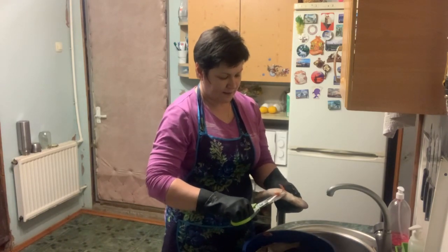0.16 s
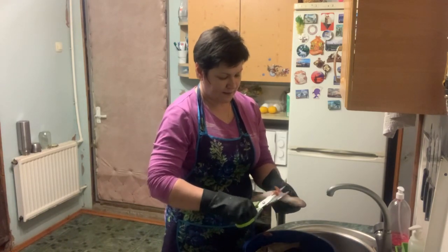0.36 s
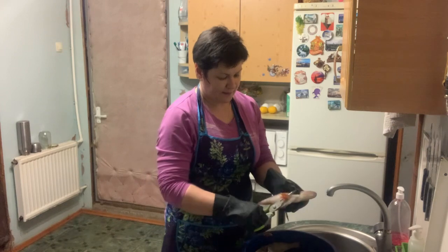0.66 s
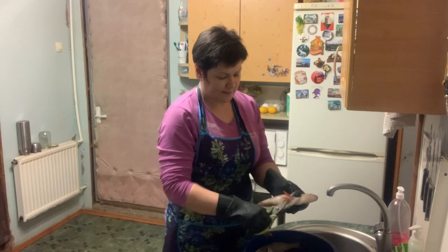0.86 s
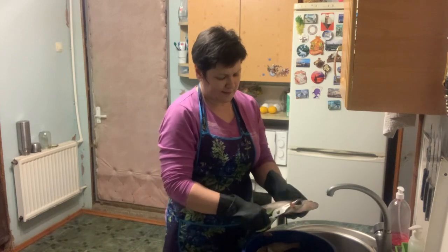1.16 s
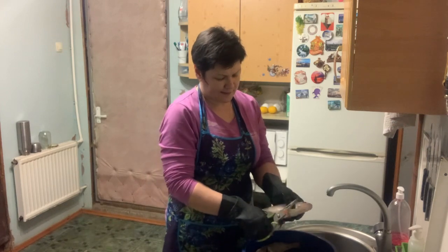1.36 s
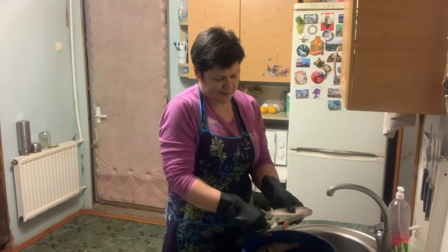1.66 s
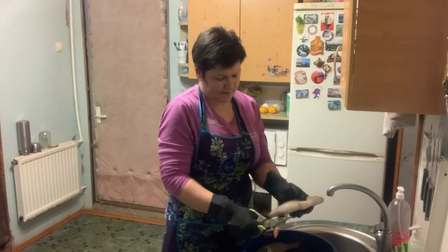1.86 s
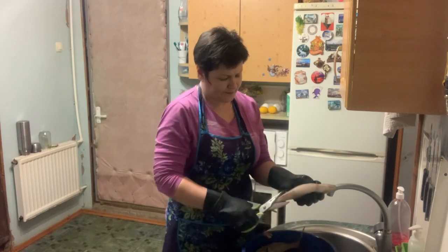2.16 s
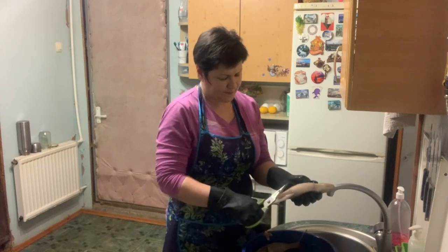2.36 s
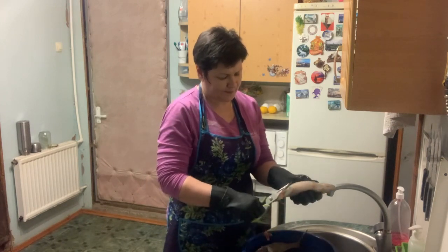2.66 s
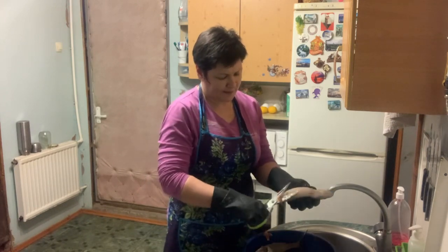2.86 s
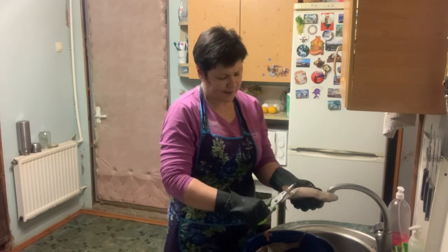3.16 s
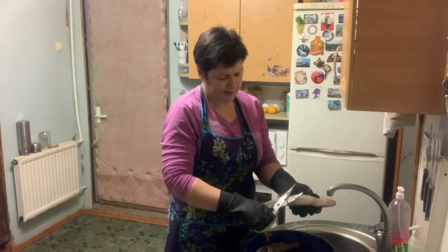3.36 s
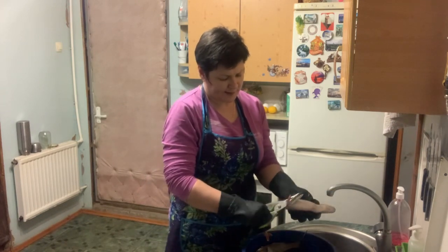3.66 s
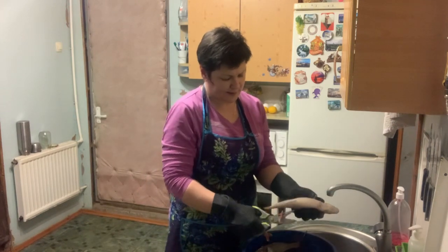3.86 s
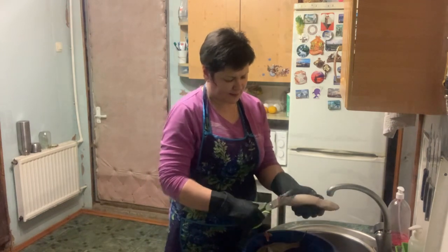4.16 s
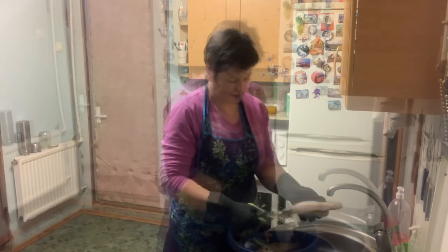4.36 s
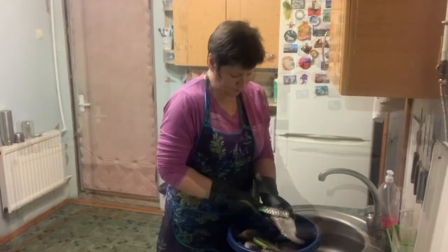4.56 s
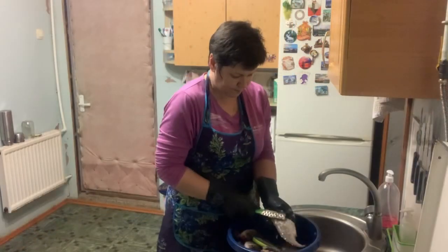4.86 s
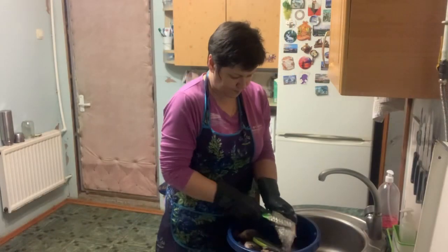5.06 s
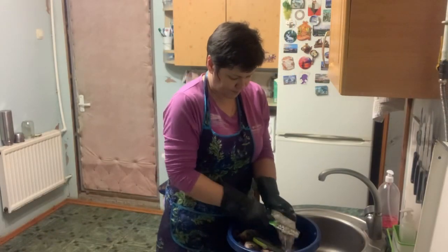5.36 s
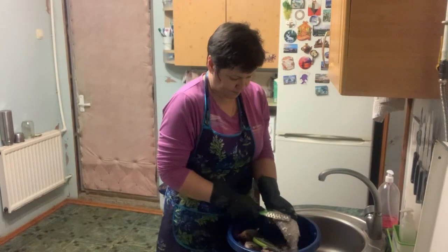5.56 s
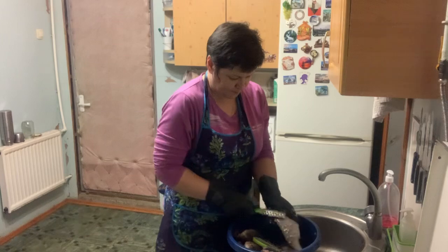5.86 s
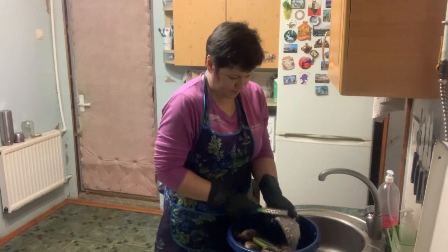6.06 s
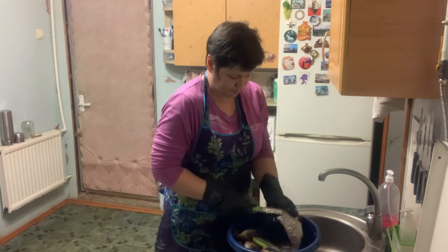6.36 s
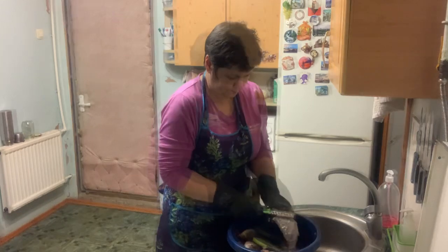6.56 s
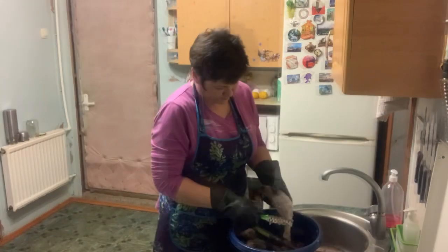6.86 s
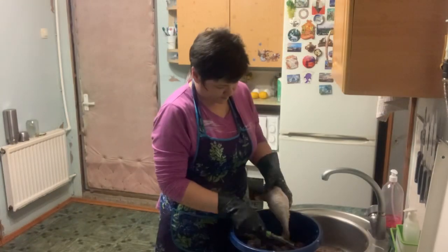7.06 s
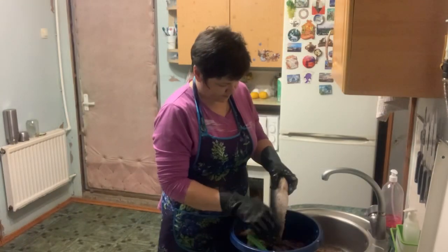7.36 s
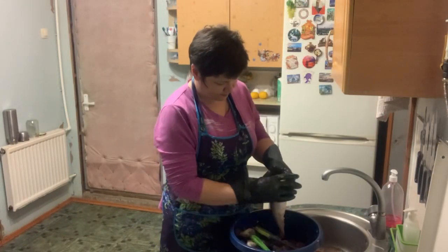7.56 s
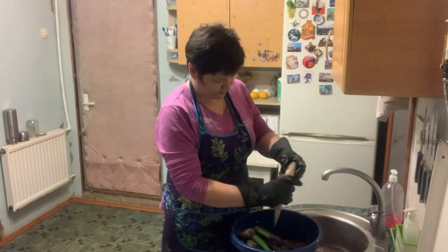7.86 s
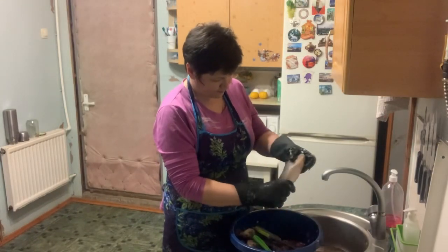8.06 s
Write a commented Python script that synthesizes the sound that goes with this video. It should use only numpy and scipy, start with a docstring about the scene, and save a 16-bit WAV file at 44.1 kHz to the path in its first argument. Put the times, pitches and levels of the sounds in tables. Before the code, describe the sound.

Close stereo pickup of fish cleaning at a sink in a small reverberant room. Mostly quiet metallic scissor clicks surround one dominant sharp crack early on. After several lighter snips comes a burst of short dry rasps, pull and return, over dull bumping fish flesh with crisp tearing scales. The rasps weaken, a tool knocks into a basin, and wet-sounding rubber gloves shift quietly over steady faint hush.

```python
"""A kitchen with bare hard walls: scissors snip through fish fins, then a toothed scaler is drawn to and fro
along the fish, and is dropped in a basin. Rubber gloves rustle in between, over steady room tone.
Snips, catches and knocks are short rings, noise cracks and thuds; the scaler and gloves are streams of
tiny random contacts. Fading noise makes the room's echo, which rings for up to half a second."""
import sys
import numpy as np
from scipy import signal
from scipy.fft import rfft, irfft, next_fast_len
from scipy.io import wavfile
from scipy.ndimage import map_coordinates

SR = 44100
rng = np.random.default_rng(int(sys.argv[2]) if len(sys.argv) > 2 else 0)


def wav_out(sig):
    """Save sig, one row per channel (or a flat mono array), as 16-bit PCM at SR to the path in sys.argv[1]."""
    wavfile.write(sys.argv[1], SR, np.round(np.clip(np.atleast_2d(sig).T, -1, 1) * 32767).astype(np.int16))


N = 361619

# Scissor snips and ticks: start_s, level_db, snap_pitch_hz, thud_db, crack_db, crack_centre_hz,
# crack_width_octaves (thud and crack are relative to the level)
SNIPS = [ (0.385, -54, 1470, -13, 0.5, 2480, 0.85), (0.57, -47, 1560, -5, -11, 1600, 1.6),
         (0.688, -50, 2420, -3, 1, 7500, 2.2), (.828, -64, 1560, -8, 8.5, 6800, 1.7),
         (.979, -45.5, 2400, -14, 1.5, 4550, 1.8), (0.9994, -38.5, 2420, -6, -1.5, 5000, 1.6),
         (1.038, -30, 2440, -6, 2, 5160, 2.3), (1.0432, -36, 1220, 1.5, 1, 2600, 4.3),
         (1.09, -48, 1210, 8, -6, 2600, 2), (1.25, -61, 1920, -13, 2, 1800, 0.43),
         (1.504, -65, 2360, -17, 8, 4030, 1.3), (1.552, -33, 1990, -3, 3.5, 2970, 1.24),
         (1.5592, -4, 1910, -24, -13.5, 3150, 0.75), (1.979, -56, 1660, -26, -10, 1520, 0.76),
         (2.077, -53, 1356, -13, -18, 1693, 0.75), (2.3555, -42.5, 1620, -13.5, -5.5, 3400, 1.12),
         (2.526, -57, 2320, -2, 1.5, 6000, 1.2), (2.538, -46, 2310, -13, 0, 4000, 1.3),
         (2.5415, -41, 2350, -12, -1.5, 3590, 1.3), (2.986, -56.5, 1590, -16, 1.5, 4000, 1.5),
         (3.018, -46.5, 2330, -15, 0.5, 4600, 2.6), (3.096, -42, 2250, -19, 0.5, 3950, 1.4),
         (3.123, -36.5, 2220, -4, -.5, 4000, 2), (3.368, -36, 1186, -20, -14, 1896, 0.82),
         (3.565, -34, 2420, -1.5, -1, 3470, 1.6), (3.569, -31, 1176, -10, -9, 1750, 2.5),
         (3.579, -31, 1240, -11, -12, 1760, 2), (3.843, -54, 1280, -10, -3.5, 2035, .76)]
# What all snips share: boom_under_thud_db, snap_overtone_db, crack_fade_s, crack_lead_in_db
SNIP_KIND = (-16.5, -6, 0.0066, -16)
# Scaler teeth catching a scale: columns as for the snips
CATCHES = [ (4.115, -60, 3890, -8, 5, 3820, 2), (4.468, -38.5, 3900, -19, 2, 6400, 0.84),
           (4.732, -47.5, 3550, -1, 10, 6740, 2), (5.0548, -43, 1530, 13.5, 3.5, 2520, 1.9),
           (5.0834, -40, 3700, -5, 6, 7200, 0.79), (5.138, -31, 3520, -22, -5, 3700, 0.75),
           (5.414, -44, 1670, 9, 2, 6800, 1), (5.44, -44, 3880, 7, 7, 6800, 0.38),
           (5.575, -40, 2640, -4, -1.5, 3550, 2.4), (5.618, -41.5, 1800, -6, -22, 2500, 3),
           (5.7154, -34.5, 3960, -2.5, 4.5, 6800, .8), (5.793, -36, 3630, -28, -4.5, 3640, 0.68),
           (6.027, -52, 2090, 3, 11.5, 4020, 2.8), (6.2955, -50, 1550, 2, 5, 3800, 1.6)]
# What all catches share: columns as for the snips
CATCH_KIND = (-20.5, -10, 0.0083, -30)
# Knocks in the basin: columns as for the snips
KNOCKS = [(6.9836, -53, 1510, -13, 2, 1350, 1.36), (7.2675, -54, 1660, -1, -5, 1690, 1.2),
          (7.3398, -15.5, 1970, -9.5, -13, 1700, .75), (7.555, -50, 1180, -1, -3, 1370, 0.66),
          (7.69, -53, 1230, 9.5, -1.5, 1450, 0.58), (7.804, -43.5, 1360, -7, -10, 1490, 1.5),
          (8.055, -66, 1400, 8, -6, 1500, 1)]
# What all knocks share: columns as for the snips
KNOCK_KIND = (-8, -11, .0065, -9)
# Ringing modes of the scissors: pitch_hz, level_db, t60_s (time to fade by 60 dB)
BLADE_MODES = [(1227, -8.5, .05), (2400, -16, 0.064)]
# Scaler strokes, pull and return in turn: start_s, length_s, peak_after_s, swell_to_peak_db, bumping_db,
# rattling_db, tearing_db
STROKES = [ (4.114, .11, 0.071, 5.5, -57.5, -58.5, -53), (4.299, 0.043, 0.028, 0, -51.5, -64.5, -65),
           (4.401, 0.15, 0.061, 14, -46.5, -54, -41.5), (4.596, .065, 0.027, -0.5, -47, -62, -58),
           (4.744, 0.065, 0.095, 2.5, -43, -54.5, -41), (4.884, 0.1, .012, 1, -43.5, -55.5, -52),
           (5.051, 0.088, 0.029, 14.5, -36.5, -46.5, -35), (5.205, .11, .055, 12, -38, -57.5, -55),
           (5.383, 0.12, 0.059, 14.5, -37.5, -50, -39), (5.578, 0.084, .03, 4, -47.5, -59.5, -58.5),
           (5.701, 0.1, 0.044, 15, -35.5, -48.5, -39), (5.892, 0.044, 0.024, 1, -43.5, -58, -56),
           (6.019, 0.11, 0.015, 9.5, -42.5, -54, -46.5), (6.179, 0.056, 0.024, 5, -50, -61.5, -61.5),
           (6.295, 0.1, 0.073, 4, -50, -61.5, -56), (6.468, .06, 0.035, 11, -46, -62.5, -59),
           (6.592, 0.066, 0.012, 9, -49.5, -61.5, -58), (6.746, 0.15, 0.062, 5, -49, -60.5, -60)]
# Dull modes of the fish in the hand: pitch_hz, width_hz, level_db
FLESH_MODES = [(194.6, 119, -4.5), (290.8, 46, 2), (374, 36, -0.5), (433, 43, -1.5), (503, 55.6, 0)]
# Sizes of scale: centre_hz, width_octaves, level_db
SCALE_SIZES = [(3700, 0.5, -2.5), (6800, 0.26, -4.5), (11100, 0.435, 0)]
# Gloves shifting on the fish: time_s, rustle_db, bright_rustle_db
GLOVE_LEVELS = [(0.0, -104, -97), (0.3, -79, -78), (0.5, -69.5, -86), (0.75, -75.5, -78),
                (0.95, -82.5, -83), (1.2, -77.5, -76), (1.9, -66.5, -90.5), (2.06, -90.5, -99.5),
                (2.26, -71.5, -83), (2.6, -65.5, -80.5), (2.95, -82.5, -91), (3.15, -60, -70.5),
                (3.5, -91, -87.5), (3.85, -71, -84), (4.05, -86, -78), (6.8, -76.5, -82),
                (7.05, -68.5, -72), (7.45, -65, -76), (7.9, -65.5, -69.5), (8.2, -69.5, -73.5)]
# Single rubs of a glove: middle_s, length_s, low_db, rustle_db, bright_db
GLOVE_RUBS = [(0.399, 0.14, -69, -66, -79), (0.896, 0.095, -64, -73.5, -73), (1.285, 0.08, -82, -60, -85),
              (1.305, 0.05, -59, -81, -87), (2.156, 0.22, -67.5, -73.5, -106),
              (2.851, 0.047, -66, -69, -69), (3.026, 0.04, -65.5, -63.5, -58), (3.336, 0.04, -61, -65, -64),
              (7.28, 0.19, -80, -90, -87), (7.576, 0.056, -64, -75, -94.5), (7.686, 0.057, -65, -70, -83),
              (7.83, 0.059, -64, -62.5, -72), (8.063, 0.018, -71, -77, -73.5)]
# Colour of the rubber rustle: frequency_hz, level_db
RUBBER_COLOUR = [(500, -15), (900, -12.5), (1400, -4), (2200, -8.5), (3500, -13), (6000, -29)]
# Colour of the bright rustle: frequency_hz, level_db
SHEEN_COLOUR = [(2000, -33), (3500, 5), (6500, 2.5), (11000, -12.5), (16000, -4.5)]
# Colour of the room tone: frequency_hz, level_db (per Hz)
HUSH_COLOUR = [(15, -37.5), (25, -17), (70, -14.5), (102, -15), (157, -24), (363, -27.5), (1160, -36),
               (7920, -50.5), (9320, -48.5), (12200, -38.5), (16000, -58.5)]
# How alike left and right are in sound from all around: frequency_hz, likeness (1 = the same)
ALIKE = [(60, 0.81), (130, 1), (300, 0.3), (640, 0.017), (1400, 0.0051), (8000, 0.21), (11000, -0.14),
         (15000, 0.38)]
# How long the kitchen rings: frequency_hz, t60_s
KITCHEN_RING = [(100, 0.2), (350, .2), (700, 0.33), (2000, 0.4), (5000, 0.49), (9000, 0.3), (14000, 0.24)]
# Strength of the room against the direct sound: frequency_hz, level_db
ROOM_SHARE = [(100, -3), (400, 0), (1000, 11.5), (2000, 5.5), (4000, 3), (8000, 6), (14000, 6.5)]
# Colour of the microphones, with a shallow and two deep dips: frequency_hz, level_db
MIC_COLOUR = [(18, -32.5), (30, 0.5), (100, 0.5), (560, -3), (740, 0.5), (1000, -6.5), (1300, -3),
              (7500, -1), (8600, -2), (9550, -24), (10300, -6.5), (11300, -4.5), (12300, -12.5),
              (13400, -39), (14200, -11), (15000, -12.5), (15800, -24)]


def cuts():
    """Scissor blades bite in, then snap, crack the fin rays and thud in the flesh."""
    return contacts(SNIPS, SNIP_KIND)


def catches():
    """A scaler tooth catches on a scale: the same parts as a snip, with other settings."""
    return contacts(CATCHES, CATCH_KIND)


def knocks():
    """Knocks in the basin: the same parts as a snip, with a stronger boom."""
    return contacts(KNOCKS, KNOCK_KIND)


def contacts(rows, kind):
    """Each hard contact is a short snap, a noisy crack, a thud in the flesh and a boom in the basin."""
    boom_db, overtone_db, crack_fade_s, lead_in_db = kind
    snap_t60 = 2.6 * crack_fade_s
    lead = SR // 25  # samples kept before the contact
    out = np.zeros((2, N + SR))
    t = (np.arange(SR // 4) - lead) / SR
    after = np.maximum(t, 0)

    def ring(hz, t60):
        return np.sin(2 * np.pi * hz * after) * amp(-60 * after / t60) * (1 - np.exp(-after / .0003))

    thud = filtered((t >= 0) * np.exp(-after / 0.001), flesh)
    # the boom has a sliding tone over a lower steady one
    boom = np.sin(2 * np.pi * 115 * after * (1 - 0.72 * after)) + 0.42 * np.sin(2 * np.pi * 66 * after)
    boom = boom * amp(-60 * after / .3) * (1 - np.exp(-after / 0.0041))
    thump = thud / thud.max() + amp(boom_db) * boom

    for start_s, level_db, pitch_hz, thud_db, crack_db, centre_hz, octaves in rows:
        band = bell(centre_hz, octaves)
        lead_in = amp(lead_in_db) * np.exp(t / 0.0056)
        shape = np.where(t < 0, lead_in, np.exp(-after / crack_fade_s))
        crack = unit(filtered(rng.standard_normal(len(t)), band)) * shape
        # summed over all directions the crack has the smooth colour of its band
        click = 1. * (np.arange(len(t)) == lead + 40)
        spread = unit(filtered(click, band)) * crack.std()
        low = amp(thud_db) * thump
        # a snap near a mode of the scissors sets that mode ringing
        blades = sum(amp(mode_db) * bell(mode_hz, .08)(pitch_hz) * ring(mode_hz, t60)
                     for mode_hz, mode_db, t60 in BLADE_MODES)
        snap = 1.2 * ring(pitch_hz, snap_t60) + amp(overtone_db) * ring(1.45 * pitch_hz, snap_t60)
        direct = snap + amp(crack_db) * crack + low + blades
        # away from the blades' axis the snap has little pitch
        blunt = 1.6 * ring(pitch_hz, .004)
        around = blunt + amp(crack_db) * (spread + crack * (t < 0)) + low + blades
        wet = heard(amp(level_db) * direct, amp(level_db) * around)
        start = round(start_s * SR) - lead
        out[:, start:][:, :wet.shape[1]] += wet[:, :N + SR - start]
    return out[:, :N]


def scaler():
    """Teeth bump over the scale rows at an uneven rate and shake the flesh; scales tear off in bunches."""
    bumping, rattling, tearing = strokes()
    bumps_per_s = 150 * (1 + .35 * wobble(140))
    hit = np.diff(np.floor(np.cumsum(bumps_per_s) / SR), prepend=0) > 0
    bumps = hit * amp(4.5 * np.clip(rng.standard_normal(N), -3, 1.4))
    body = unit(filtered(unit(bumps) + 0.29 * rng.standard_normal(N), flesh))
    rattle = unit(filtered(grains(900, spread_db=2.5), bell(1480, 0.83)))

    bunching = wobble(250)  # all sizes catch together
    tear = np.zeros(N)
    for centre_hz, octaves, level_db in SCALE_SIZES:
        swing_db = np.minimum(4 * wobble(120) + 5 * bunching, 11)
        tear += amp(level_db + swing_db) * unit(filtered(grains(900, spread_db=6), bell(centre_hz, octaves)))

    low = bumping * amp(2.5 * wobble(30)) * body
    high = rattling * rattle + tearing * unit(tear)
    # the cook and the basin shade the walls
    return moving(low + high, amp(-6.5) * low + amp(-1.5) * high, pan_db=0.5)


def strokes():
    """Loudness of bumping, rattling and tearing: teeth bite, swell to a peak, ease and lift."""
    bite_db_per_s, ease_db_per_s, lift_db_per_s = 1000, 75, 520
    tear_rise_db_per_s, tear_sag_db_per_s, tear_end_db_per_s = 494, 108, 250
    press_swell = 0.55  # share of the swell that the bumping follows
    t = np.arange(-SR // 10, SR // 2) / SR
    out = np.zeros((3, N))
    early = np.maximum(-t, 0)
    for start_s, length_s, peak_s, swell_db, bump_db, rattle_db, tear_db in STROKES:
        past_peak = np.maximum(t - peak_s, 0)
        past_end = np.maximum(t - length_s, 0)
        short_db = swell_db * np.clip(1 - t / peak_s, 0, 1)  # how far still below the peak
        press = amp(-bite_db_per_s * early - press_swell * short_db
                    - ease_db_per_s * past_peak - lift_db_per_s * past_end)
        rip = amp(-tear_rise_db_per_s * early - short_db
                  - tear_sag_db_per_s * past_peak - tear_end_db_per_s * past_end)
        start = round((start_s + t[0]) * SR)
        out[:, start:][:, :len(t)] += [amp(bump_db) * press, amp(rattle_db) * rip, amp(tear_db) * rip]
    return out


def hands():
    """Gloves rub the fish and each other: a low drag and fine rubber grains, swelling with each rub."""
    rustle_db, sheen_db = curves(GLOVE_LEVELS)
    gain = amp([rustle_db - 6, rustle_db, sheen_db])  # low drag, rustle, bright sheen
    t = np.arange(N) / SR
    for middle_s, length_s, *levels_db in GLOVE_RUBS:
        swell = np.exp(-(2 * (t - middle_s) / length_s) ** 4)
        gain = gain + amp(levels_db)[:, None] * swell
    drag = unit(filtered(grains(300, spread_db=2), flesh))
    rustle = unit(coloured(amp(2.2 * wobble(40)) * grains(2000, spread_db=3.5), RUBBER_COLOUR))
    sheen = unit(coloured(grains(3400, spread_db=3.0), SHEEN_COLOUR))
    rubbing = np.sum(gain * [drag, rustle, sheen], axis=0)
    return moving(rubbing, amp(-2) * rubbing)


def hush():
    """Steady room tone: coloured noise arriving from all around."""
    return amp(-69.5) * unit(coloured(diffuse(N), HUSH_COLOUR))


def flesh(hz):
    """Response of the fish: a few dull modes; little passes above or below them."""
    modes = 0
    for k, (centre_hz, width_hz, level_db) in enumerate(FLESH_MODES):
        damping = 1j * hz * width_hz
        modes = modes + (-1) ** k * amp(level_db) * damping / (centre_hz ** 2 - hz ** 2 + damping)
    high, low = 1j * hz / 580, 1j * hz / 110
    treble_cut = 1 / (1 + 0.91 * high + high ** 2) ** 3
    bass_cut = low ** 2 / (1 + 1.7 * low + low ** 2)
    return modes * treble_cut * bass_cut


def heard(x, around, pan_db=0):
    """Direct sound at both microphones plus the room's echo, each frequency dying at its own speed."""
    hz, t, z = signal.stft(diffuse(SR // 2), SR, nperseg=256)
    fall = amp(-60 * t / along(KITCHEN_RING, hz)[:, None])
    share = amp(along(ROOM_SHARE, hz))[:, None] / np.linalg.norm(fall, axis=1, keepdims=True)
    tail = signal.istft(z * fall * share, SR, nperseg=256)[1] / np.sqrt(128)
    tail = tail * (1 - np.exp(-np.arange(tail.shape[1]) / SR / .003))  # the first walls take a few ms
    wet = signal.fftconvolve(around[None], tail, axes=1) * amp([[.6], [-.6]])
    lag = 3  # samples by which direct sound reaches the left microphone late
    wet[0, lag:len(x) + lag] += x * amp(pan_db / 2)
    wet[1, :len(x)] += x * amp(-pan_db / 2)
    return wet


def moving(x, around, pan_db=0):
    """A source that shifts about meets the walls anew every half second."""
    out, step = np.zeros((2, N + 2 * SR)), SR // 2
    for start in range(0, N, step):
        wet = heard(x[start:start + step], around[start:start + step], pan_db)
        out[:, start:start + wet.shape[1]] += wet
    return out[:, :N]


def diffuse(count):
    """A pair of noises whose left-right likeness varies with frequency, as in sound from all around."""
    def mid_and_side(hz):
        turn = np.arccos(np.clip(along(ALIKE, hz), -1, 1)) / 2
        return np.array([np.cos(turn), np.sin(turn)])

    mid, side = filtered(rng.standard_normal((2, count)), mid_and_side)
    return np.array([mid + side, mid - side])


def grains(per_s, spread_db):
    """Irregular single contacts of uneven size, scaled to an average (rms) level of 1."""
    hit = rng.random(N) < per_s / SR
    size = amp(spread_db * np.clip(rng.standard_normal(N), -3, 1.8))
    return unit(hit * rng.choice([-1, 1], N) * size)


def wobble(per_s):
    """A smooth random curve through per_s random points a second."""
    points = rng.standard_normal(int(N * per_s / SR) + 4)
    return map_coordinates(points, [np.arange(N) * per_s / SR])


def bell(centre_hz, octaves):
    """A bell-shaped band on a log frequency axis."""
    return lambda hz: np.exp(-.5 * (np.log2((hz + 1) / centre_hz) / octaves) ** 2)


def coloured(x, spectrum):
    """x with each frequency raised or lowered by a (Hz, dB) table."""
    return filtered(x, lambda hz: amp(along(spectrum, hz)))


def filtered(x, response):
    """x with its spectrum multiplied by a response that depends on frequency."""
    m = next_fast_len(x.shape[-1] + 4096)
    spectrum = rfft(x, m) * response(np.fft.rfftfreq(m, 1 / SR))
    return irfft(spectrum, m)[..., :x.shape[-1]]


def along(points, hz):
    """Read between (Hz, value) points on a log frequency axis."""
    f, v = np.transpose(points)
    return np.interp(np.log(hz + 1), np.log(f + 1), v)


def curves(rows):
    """One value per sample for each column after the time."""
    s, *cols = np.transpose(rows)
    return [np.interp(np.arange(N) / SR, s, c) for c in cols]


def amp(db):
    """Decibels to an amplitude factor."""
    return 10 ** (np.asarray(db) / 20)


def unit(x):
    """x scaled to an average (rms) level of 1."""
    return x / np.sqrt(np.mean(x ** 2) + 1e-20)


def scene():
    """All the kitchen sounds added together."""
    return cuts() + catches() + knocks() + scaler() + hands() + hush()


def record(dry):
    """The microphones colour the sound; nothing is kept from the band limit upwards."""
    band_limit_hz = 15850
    return filtered(coloured(dry, MIC_COLOUR), lambda hz: hz < band_limit_hz)


dry = scene()
out = record(dry)
wav_out(out)
```